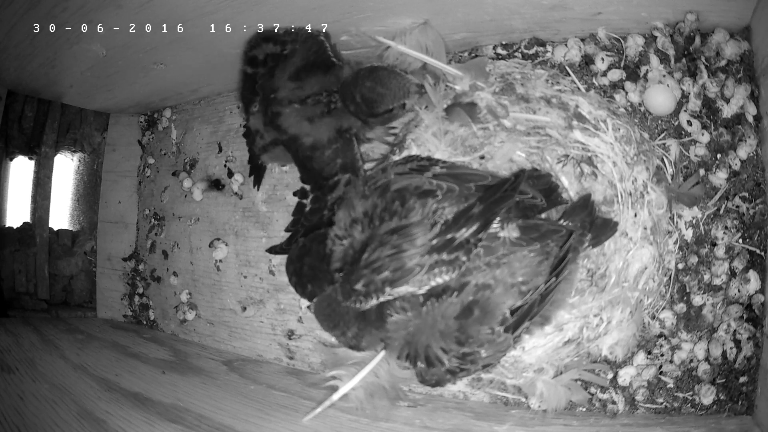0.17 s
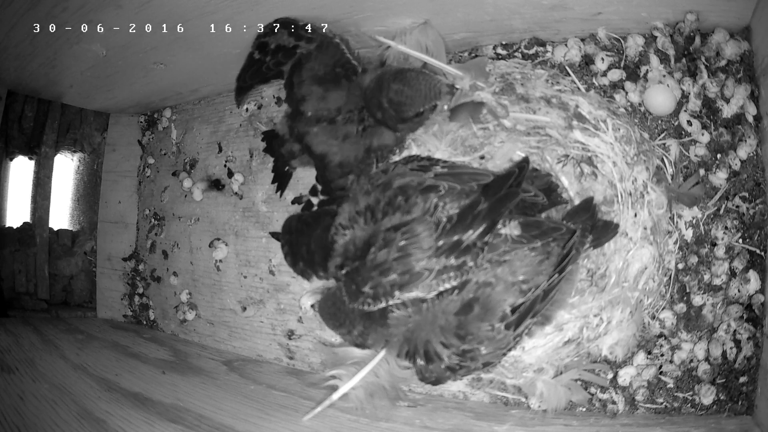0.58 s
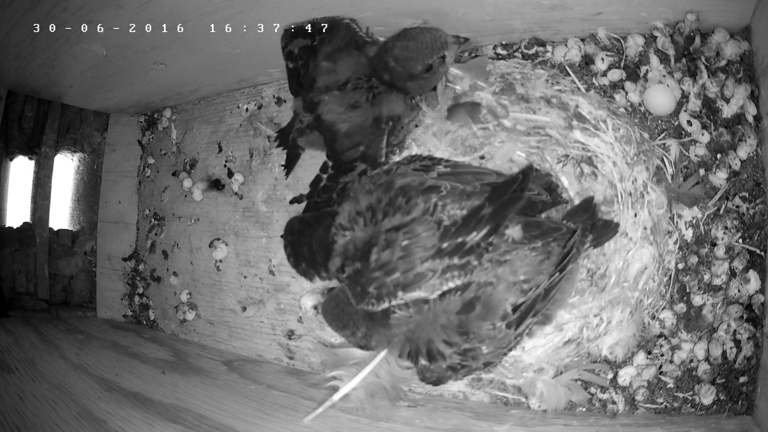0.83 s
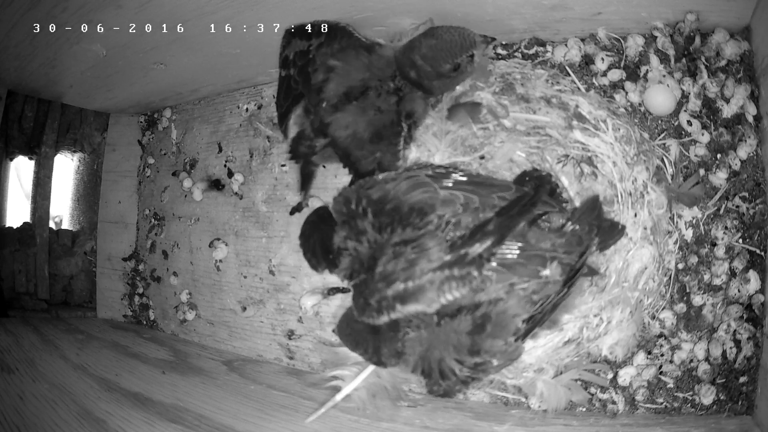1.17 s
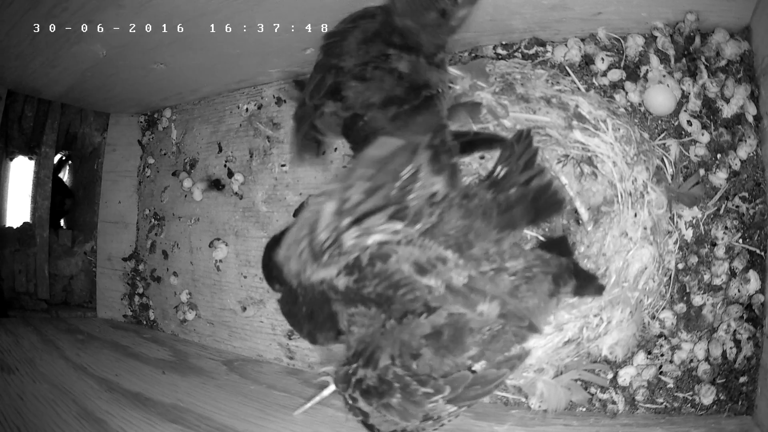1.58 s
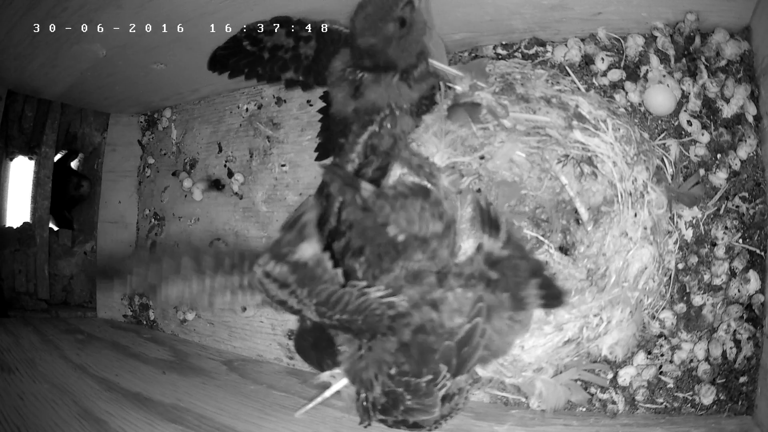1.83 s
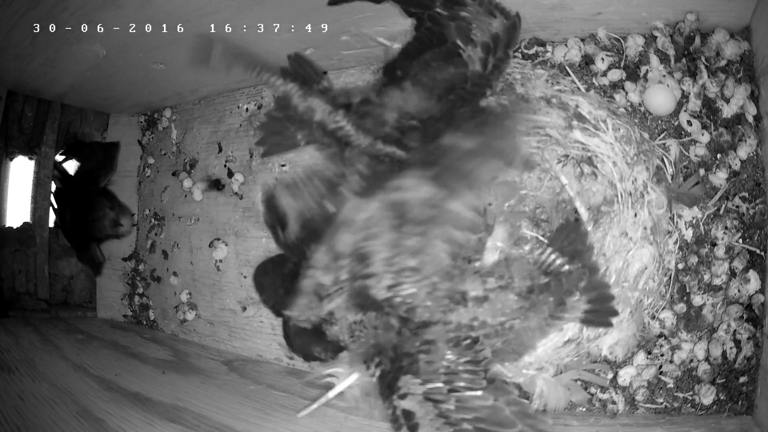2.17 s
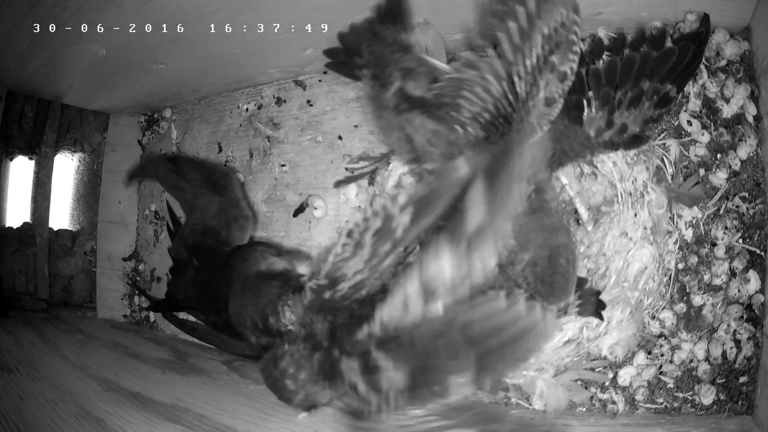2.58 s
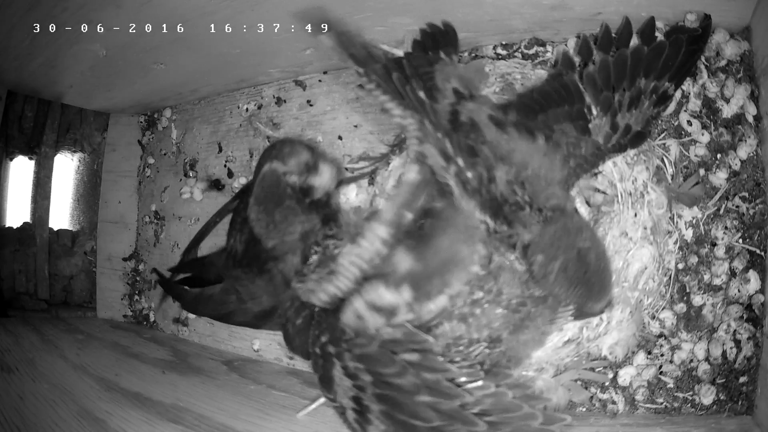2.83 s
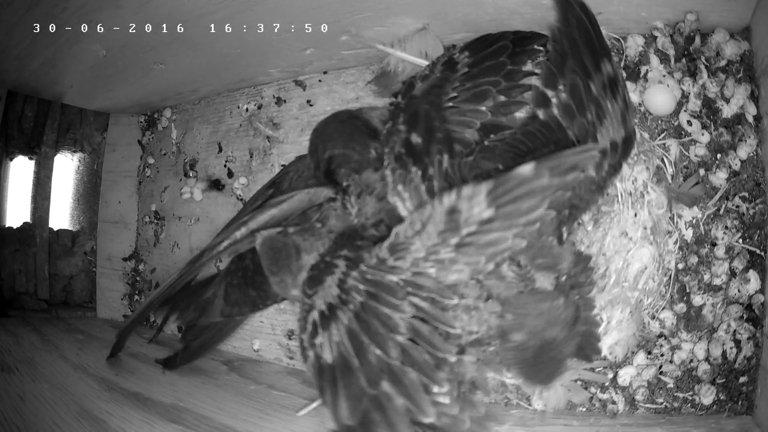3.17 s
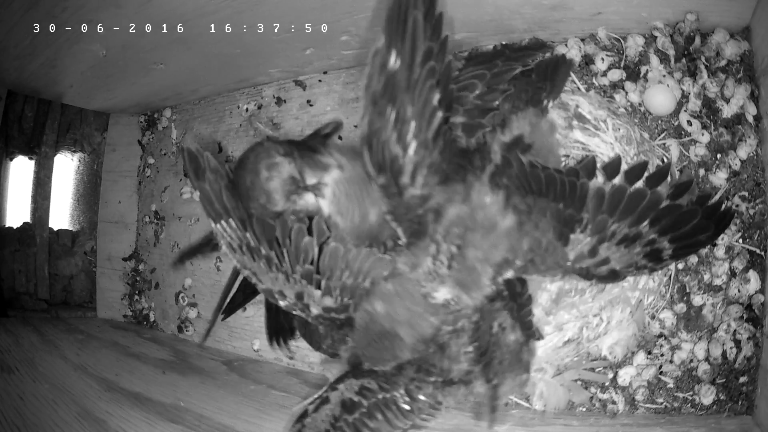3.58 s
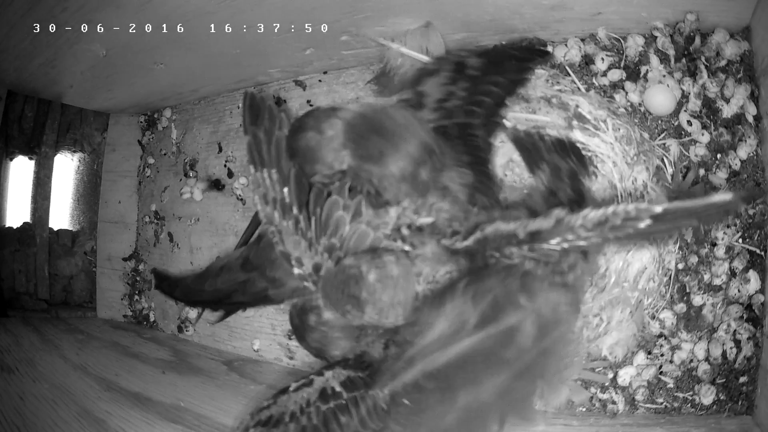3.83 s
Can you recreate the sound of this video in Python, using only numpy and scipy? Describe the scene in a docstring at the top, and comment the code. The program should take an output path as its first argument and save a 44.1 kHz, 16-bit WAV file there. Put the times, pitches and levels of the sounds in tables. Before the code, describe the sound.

Birds scramble in a small wooden nest box, close and boxy. Until 1.2 s there is only low shuffling, fine litter rustle and light feather ticks over faint hiss. A heavy thump lands near 1.3 s, then scrapes and wing puffs build. From 2.0 to 2.45 s hard, clattering feather strokes peak and distort, with a barely audible thin squeak near 2.2 s; uneven flapping and scratching continue, somewhat softer, to the end.

```python
"""A low shuffling and fine litter rustle come first, over a faint hiss; light feather strokes soon crackle on top.
Birds then scramble in a wooden nest box: stiff feathers scrape the walls as runs of clicks from catching barbs,
wings throw falling pressure waves and turbulent puffs, and landing bodies ring the low modes of the boards.
Claws and quills scrabble in noise bursts; two faint thin tones near 4 kHz move towards each other and part again.
All but the hiss, thumps and thin tones is coloured by the box; the loudest blows overload the close microphone."""
import sys
import numpy as np
from scipy import signal
from scipy.fft import rfft, irfft
from scipy.io import wavfile
from scipy.ndimage import map_coordinates

SR = 44100
rng = np.random.default_rng(int(sys.argv[2]) if len(sys.argv) > 2 else 0)


def materialize(psi):
    """Save the field psi as 16-bit PCM at rate SR to the path in sys.argv[1].

    A 1-D psi becomes a single channel; in a 2-D psi each row is a channel.
    """
    bounded = np.clip(np.atleast_2d(psi).T, -1, 1)
    quanta = np.round(bounded * 32767).astype(np.int16)
    wavfile.write(sys.argv[1], SR, quanta)


N = 176400  # samples


def amp(db):
    """Decibel definition: a level difference as an amplitude ratio."""
    return 10 ** (np.asarray(db) / 20)


def unit(x):
    """Normalisation to a root-mean-square amplitude of one."""
    return x / np.sqrt(np.mean(x ** 2) + 1e-20)


def along(points, hz):
    """Spectral envelope: (frequency [Hz], level [dB]) points joined on a logarithmic frequency axis."""
    f, v = np.transpose(points)
    return np.interp(np.log(hz + 1), np.log(f + 1), v)


def curve(rows):
    """Level contour: (time [s], level [dB]) rows interpolated to one value per sample."""
    return np.interp(np.arange(N) / SR, *np.transpose(rows))


def add(track, s, x):
    """Superposition: mix x into the track at time s."""
    i = max(round(s * SR), 0)
    track[i:i + len(x)] += x[:max(N - i, 0)]


def focus(f, hz, octaves):
    """Spectral concentration: a Gaussian bell around one pitch on an octave scale."""
    return np.exp(-.5 * (np.log2((f + 1) / hz) / octaves) ** 2)


def clicks(count, rate, spread_db):
    """Random impulse process: independently timed clicks of either sign and uneven size."""
    chance, sign = rng.random((2, count))
    size = amp(spread_db * np.clip(rng.standard_normal(count), -2, 2))
    return (chance < rate / SR) * np.sign(sign - .5) * size


def wobble(rate, count=N):
    """Slow random modulation: a spline through random knots, rate of them a second."""
    return map_coordinates(rng.standard_normal(2048), [np.arange(count) * rate / SR], mode="wrap")


def swell(t, length, rise, fall):
    """Amplitude envelope: linear attack, hold until length, exponential release."""
    return np.minimum(t / rise, 1) * np.exp(-np.maximum(t - length, 0) / fall)


def at_level(x, db, seconds):
    """Energy scaling: give a burst the energy of that level held for that long."""
    return x * amp(db) * np.sqrt(seconds * SR / (np.sum(x ** 2) + 1e-20))


# resonances of the box: (frequency [Hz], width [Hz], lift [dB])
BOX_MODES = [(80, 12, 5.5), (163, 59, 8.5), (304, 17, 12.5), (338, 28, 8.5), (462, 30, 3.5),
             (528, 60, 10.5), (672, 24, 12.5), (734, 32, 16), (915, 28, 9), (987, 30, 12), (1194, 30, 20.5),
             (1455, 40, 13), (1535, 36, 16), (1633, 60, 9), (1869, 35, 10), (2118, 46, 10.5), (2655, 40, 8),
             (3030, 110, 5.5), (3340, 90, 4), (3630, 64, 4.5), (4370, 70, 6), (4965, 110, 6), (5350, 52, 5),
             (5885, 44, 7), (6120, 30, 6), (6468, 70, 14), (6808, 22, 17)]
# dips in the spectrum: (frequency [Hz], width [Hz], cut [dB])
SPECTRAL_DIPS = [(246, 44, 9), (395, 40, 5.5), (612, 45, 9), (800, 30, 4), (1080, 45, 9.5), (1330, 70, 10),
                 (1990, 80, 10), (2830, 110, 5), (4020, 280, 4), (6650, 110, 7)]


def in_box(x, colour, ring=1, size=8192):
    """Minimum-phase filtering: a source colour (dB against Hz), the box resonances and the dips act causally."""
    f = np.fft.rfftfreq(size, 1 / SR)

    def bell(hz, width):
        return 1 / (1 + (2 * (f - hz) / width) ** 2)

    lift = 1 + sum((amp(db) ** 2 - 1) * bell(hz, width) for hz, width, db in BOX_MODES)
    cut = amp(-sum(db * bell(hz, width) for hz, width, db in SPECTRAL_DIPS))
    box = np.sqrt(np.abs(lift)) * cut
    # folding the cepstrum forward in time makes the response causal
    cepstrum = irfft(np.log(np.maximum(amp(colour(f)) * box ** ring, 1e-6)))
    cepstrum[1:size // 2] *= 2
    cepstrum[size // 2 + 1:] = 0
    response = irfft(np.exp(rfft(cepstrum)))
    return signal.fftconvolve(x, response)[:len(x)]


ECHO_T60_S, ECHO_DB = 0.016, -3  # 60 dB decay time, energy of the tail against the direct sound


def echo(x, size=2048):
    """Diffuse reverberation: dense decaying reflections between the walls, different from every spot."""
    tail = rng.standard_normal(size) * amp(-60 * np.arange(size) / SR / ECHO_T60_S)
    return x + amp(ECHO_DB) * signal.fftconvolve(x, tail / np.linalg.norm(tail))[:len(x)]


HISS_DB = -55.5
# spectrum of the hiss: (frequency [Hz], relative level [dB])
HISS_SPECTRUM = [(100, 9.5), (1500, 4), (4000, -7.5), (6500, -21.5), (7200, -31.5)]


def hiss():
    """Stationary noise: a faint, steady hiss shaped by its own spectrum, without the box."""
    noise = rng.standard_normal(N)
    return amp(HISS_DB) * unit(in_box(noise, lambda f: along(HISS_SPECTRUM, f), ring=0))


# two faint thin tones, one row: (time [s], length [s], level [dB], upper pitch away from the bend [Hz])
TONE_PAIR = (2.188, .052, -49, 4410)
BEND_HZ, BEND_S = 400, .006  # depth and Gaussian width of each tone's bend
ROUGHNESS, MIDWAY_HZ = .3, 4000  # depth of the amplitude roughness, pitch midway between the tones


def thin_tones():
    """Frequency modulation: two thin, rough tones near 4 kHz move towards each other and part again."""
    out = np.zeros(N)
    s, length, db, hz = TONE_PAIR
    n = int(length * SR)
    from_middle = np.arange(n) / SR - length / 2
    upper = hz - BEND_HZ * np.exp(-(from_middle / BEND_S) ** 2)
    lower = 2 * MIDWAY_HZ - upper
    tones = sum(np.sin(2 * np.pi * np.cumsum(pitch) / SR) for pitch in (upper, lower))
    rough = 1 + ROUGHNESS * wobble(600, count=n)
    add(out, s, amp(db) * unit(signal.windows.tukey(n) * rough * tones))
    return out


# course of the litter rustle, before the trims below: (time [s], level [dB])
RUSTLE_LEVEL = [(0.0, -43.5), (0.13, -51.5), (0.3, -54.5), (0.76, -52), (1.01, -49.5), (1.59, -40),
                (1.7, -41.5), (1.83, -37.5), (2.13, -29), (2.24, -34.5), (2.28, -30.5), (2.39, -29),
                (2.8, -33.5), (3.01, -35.5), (3.17, -36), (3.45, -33.5), (3.85, -39), (4.0, -39.5)]
# spectrum of the litter: (frequency [Hz], relative level [dB])
LITTER_SPECTRUM = [(100, -22), (300, -5), (600, -9.5), (1000, -4.5), (1500, -9.5), (2200, -10.5),
                   (3300, -17.5), (4000, -25), (4700, -22), (6400, -25.5), (7200, -28.5)]
# course of the low shuffling, before its trim: (time [s], level [dB])
SHUFFLE_LEVEL = [(0.0, -40.5), (0.23, -39), (1.05, -40), (1.25, -31.5), (1.59, -36), (1.72, -29.5),
                 (1.78, -23.5), (2.14, -31.5), (2.31, -26.5), (2.54, -30), (2.82, -31), (3.48, -29),
                 (4.0, -30)]
# spectrum of the shuffling: (frequency [Hz], relative level [dB])
SHUFFLE_SPECTRUM = [(25, -15.5), (60, -7), (120, -5), (170, -4.5), (230, -13.5), (400, -22.5), (800, -29.5),
                    (2000, -45.5), (7000, -67.5)]
RUSTLE_DB, SHUFFLE_DB = -4, -2.5  # trims added to the courses
CRACKLES_PER_S, CRACKLE_SPREAD_DB = 1200, 2.5
FLICKER_DB, FLICKER_KNOTS_PER_S = 3.5, 59.86  # largest swing of the crackle either way, and its pace
RUSTLE_RING = .7  # share of the box colouring, in dB, that the litter gets


def nest():
    """Granular friction: feet and plumage stir the litter, a fine crackle over low shuffling noise."""
    crackle = clicks(N, CRACKLES_PER_S, CRACKLE_SPREAD_DB)
    crackle = crackle * amp(FLICKER_DB * np.tanh(wobble(FLICKER_KNOTS_PER_S)))
    rustle = unit(in_box(crackle, lambda f: along(LITTER_SPECTRUM, f), ring=RUSTLE_RING))
    shuffle = unit(in_box(rng.standard_normal(N), lambda f: along(SHUFFLE_SPECTRUM, f)))
    rustle = rustle * amp(curve(RUSTLE_LEVEL) + RUSTLE_DB)
    return rustle + shuffle * amp(curve(SHUFFLE_LEVEL) + SHUFFLE_DB)


SCRATCHES_PER_S, SCRATCH_S, SCRATCH_FALL_S = 85, .005, .002  # rate, mean length, release
SCRATCH_SPREAD_DB = 5  # largest deviation either way
SCRATCH_DB, SCRATCH_TILT_DB = -3, 1  # trim on the rustle course; tilt per octave against the litter
RISE_SHARE = 0.21  # attack as a share of a scrape's length
TREBLE_HZ = 3000  # pivot of the scratch tilt and midpoint of the feather treble shelf


def scratches(size=1024):
    """Stick and slip: claws and quills make many tiny scrapes, each from another spot and so coloured anew."""
    out, t = np.zeros(N), np.arange(size) / SR
    draws = rng.random((int(SCRATCHES_PER_S * N / SR), 3))
    for k, (when, span, strength) in enumerate(draws):
        length = SCRATCH_S * (.5 + span)
        envelope = swell(t, length, RISE_SHARE * length, SCRATCH_FALL_S)
        scrape = unit(echo(rng.standard_normal(size) * envelope))
        db = SCRATCH_SPREAD_DB * (2 * strength - 1)
        add(out, (k + 2 * when) / SCRATCHES_PER_S, amp(db) * scrape)

    def colour(f):
        return along(LITTER_SPECTRUM, f) + SCRATCH_TILT_DB * np.log2((f + 1) / TREBLE_HZ)

    return unit(in_box(out, colour)) * amp(curve(RUSTLE_LEVEL) + SCRATCH_DB)


# bodies landing on the boards: (time [s], gain of the blow [dB])
LANDINGS = [(1.05, -20), (1.2803, 8.5), (1.839, -7.5), (3.393, -14.5), (3.537, -16)]
# lowest modes of the boards: (frequency [Hz], relative level [dB], 60 dB decay time [s])
BOARD_MODES = [(76, -13, .06), (143, 0, .075), (305, -26, .05)]
THUMP_RISE_S = .004  # time constant of the soft contact
PUSH_DB, PUSH_S = -13, .005  # gain of the dull shove, and the moment it reverses


def thumps(size=8192):
    """Modal excitation: a soft, heavy contact shoves the boards and rings their lowest modes."""
    out, t = np.zeros(N), np.arange(size) / SR
    ring = sum(amp(db - 60 * t / t60) * np.sin(2 * np.pi * hz * t) for hz, db, t60 in BOARD_MODES)
    push = amp(PUSH_DB) * (1 - t / PUSH_S) * np.exp(1 - t / PUSH_S)
    contact = 1 - np.exp(-t / THUMP_RISE_S)
    for s, db in LANDINGS:
        add(out, s, amp(db) * (ring + push) * contact)
    return out


# wing beats pushing air: (time [s], length [s], level [dB], strongest pitch [Hz])
WING_BEATS = [(.065, 0.051, -45, 279), (.24, 0.086, -41, 267.3), (1.17, 0.014, -40.5, 59),
              (1.273, 0.027, -18.5, 79), (1.33, 0.063, -34.5, 148), (1.369, 0.024, -37.5, 101),
              (1.52, 0.029, -28.5, 81), (1.607, 0.016, -24, 168), (1.64, 0.052, -30.5, 200.3),
              (1.745, 0.018, -24.5, 288), (1.81, 0.066, -24, 120.8), (1.915, 0.018, -25.5, 299.6),
              (2.03, 0.035, -32, 151.4), (2.105, 0.032, -27, 124), (2.145, 0.033, -20.5, 148.3),
              (2.21, 0.027, -31.5, 165), (2.25, 0.051, -24, 128.7), (2.3, 0.1, -29.5, 101.2),
              (2.365, 0.028, -26.5, 168), (2.415, 0.067, -23.5, 217), (2.52, 0.028, -28, 171),
              (2.57, 0.055, -30, 170.3), (2.625, 0.047, -25, 91), (2.71, 0.046, -29, 168),
              (2.76, 0.032, -30.5, 164), (2.915, 0.013, -34.5, 293), (3.003, 0.0042, -19, 166),
              (3.017, 0.012, -22.5, 229), (3.044, 0.053, -26.5, 115), (3.11, 0.04, -30, 230),
              (3.2, 0.032, -26, 379), (3.345, 0.0073, -26.5, 150), (3.392, 0.018, -21.5, 272),
              (3.43, 0.046, -28.5, 127), (3.54, 0.022, -18.5, 236.4), (3.575, 0.023, -22, 102),
              (3.705, 0.012, -25.5, 125), (3.872, 0.011, -27.5, 167), (3.938, 0.011, -30, 147)]
# spectrum of the moved air: (frequency [Hz], relative level [dB])
AIR_SPECTRUM = [(25, -8.5), (70, -2.5), (150, -8), (350, -9.5), (560, -22.5), (1200, -43.5), (3000, -51),
                (7000, -67)]
BUFFET_RISE_S, BUFFET_FALL_S, BUFFET_FOCUS_DB = 0.00821, 0.0096, 7
BUFFET_WAVE_SHARE = .45  # energy share of the smooth wave; the rest is turbulence
BUFFET_SWOOP_OCTAVES, BUFFET_WAVER_OCTAVES = 1, .3  # fall in pitch, scale of its unsteadiness


def wings(size=8192):
    """Displacement and turbulence: each beat throws a rounded wave, falling in pitch, and a noisy puff."""
    out, t = np.zeros(N), np.arange(size) / SR
    for s, length, db, hz in WING_BEATS:
        def air(f):
            return along(AIR_SPECTRUM, f)

        def focused_air(f):
            return air(f) + BUFFET_FOCUS_DB * focus(f, hz, octaves=1.0)

        envelope = swell(t, length, BUFFET_RISE_S, BUFFET_FALL_S)
        life = length + BUFFET_FALL_S
        swoop = BUFFET_SWOOP_OCTAVES * (.5 - np.minimum(t / life, 1))
        octaves = swoop + BUFFET_WAVER_OCTAVES * wobble(2 * hz, count=size)
        wave = unit(envelope * np.sin(2 * np.pi * np.cumsum(hz * 2 ** octaves) / SR))
        wave = unit(in_box(wave, air))
        eddies = unit(in_box(envelope * rng.standard_normal(size), focused_air))
        puff = np.sqrt(BUFFET_WAVE_SHARE) * wave + np.sqrt(1 - BUFFET_WAVE_SHARE) * eddies
        add(out, s - BUFFET_RISE_S / 2, at_level(puff, db, life))
    return out


# feather strokes on the walls: (time [s], length [s], level [dB], strongest pitch [Hz], treble lift [dB])
FEATHER_STROKES = [(0.056, 0.015, -30.5, 1410, -2.5), (0.077, 0.0077, -34, 1390, 3),
                   (0.093, 0.0078, -35.5, 1380, 3.5), (0.183, 0.0084, -43.5, 1570, -3),
                   (0.212, 0.014, -39.5, 1280, -1), (0.233, 0.019, -40, 1490, 9),
                   (0.258, 0.057, -36, 1240, -1), (0.442, 0.003, -46, 1530, 13),
                   (.515, 0.019, -45.5, 1420, 7), (0.582, 0.014, -40, 1180, 0),
                   (0.604, 0.014, -45.5, 1210, 9), (0.669, 0.0086, -40.5, 1520, 6),
                   (0.683, 0.033, -37.5, 1380, 8), (0.728, 0.056, -45, 1600, 8),
                   (0.789, 0.017, -40.5, 1600, 7), (1.121, 0.00096, -33, 3870, 10),
                   (1.272, 0.02, -24.5, 1530, 4), (1.35, 0.043, -41.5, 1000, -23),
                   (1.465, 0.026, -42.5, 1080, 9), (1.511, 0.025, -36, 855, -5),
                   (1.566, 0.02, -21.5, 1120, -5), (1.602, .012, -31, 950, -22),
                   (1.622, 0.016, -32.5, 980, 5.5), (1.663, 0.0038, -26.5, 670, -13),
                   (1.675, 0.016, -32, 715, -21), (1.748, 0.022, -31.5, 540, -19),
                   (1.765, 0.018, -35, 1450, -5.5), (1.805, 0.064, -31, 920, -13),
                   (1.849, 0.0046, -19.5, 1820, -2.5), (1.857, 0.022, -27, 1160, 6),
                   (1.916, 0.017, -38, 1040, 5.5), (1.96, 0.0048, -30.5, 1200, -16),
                   (2.022, 0.01, -13.5, 1296, 0), (2.072, 0.0095, -20, 1400, 4),
                   (2.117, 0.01, -20, 1860, 3), (2.142, 0.0092, -22.5, 1400, 3),
                   (2.15, 0.0072, -10, 1595, -0.5), (2.174, 0.006, -19.5, 1180, -10),
                   (2.243, 0.0094, -13, 2940, 3), (2.253, 0.0066, -16, 1200, 5.5),
                   (2.283, 0.0073, -21, 1270, 12.5), (2.289, 0.012, -15, 1222, -6.5),
                   (2.342, 0.0082, -12, 1560, 4), (2.352, 0.0087, -11.5, 1950, 5.5),
                   (2.391, 0.0036, -11, 1510, 7), (2.434, 0.025, -16.5, 740, -1.5),
                   (2.463, 0.011, -26, 1300, 4), (2.475, 0.0051, -41, 1410, 2),
                   (2.505, 0.017, -32.5, 1500, -1.5), (2.566, 0.016, -18.5, 1400, -7),
                   (2.578, 0.0089, -29.5, 1520, -3), (2.594, 0.014, -29, 1530, 17),
                   (2.634, 0.015, -27, 1610, -21), (2.664, 0.016, -25.5, 1370, 3),
                   (2.695, 0.0045, -23, 1570, 8), (2.704, 0.0046, -15.5, 1610, 4),
                   (2.711, 0.011, -20, 1440, 10), (2.759, 0.012, -26, 1550, 11.5),
                   (2.769, 0.02, -27.5, 1500, 4), (2.795, 0.024, -26.5, 1850, 5),
                   (2.861, 0.0027, -21.5, 1600, 6.5), (2.869, 0.0092, -18.5, 1350, 7),
                   (2.908, 0.01, -24, 1490, -2.5), (2.967, 0.0038, -25.5, 1840, 0),
                   (3.043, 0.0067, -25, 1300, 11), (3.048, 0.0069, -16.5, 1760, 6.5),
                   (3.111, .012, -37, 530, -14.5), (3.138, 0.018, -30, 1320, -2),
                   (3.21, 0.014, -25.5, 615, -4), (3.25, 0.013, -25, 1500, -1.5),
                   (3.266, 0.013, -23, 1200, 0), (3.372, 0.03, -33.5, 1450, -7),
                   (3.454, 0.01, -29, 1340, 1), (3.489, 0.0071, -22, 1550, 4),
                   (3.518, 0.0025, -30.5, 1540, 6), (3.538, 0.0037, -24, 1470, -7),
                   (3.569, 0.07, -34, 1510, 1), (3.625, 0.0097, -23.5, 1635, 4.5),
                   (3.679, 0.015, -39, 1500, -12), (3.746, 0.014, -28.5, 784, -14),
                   (3.775, 0.0089, -34.5, 1510, 14), (3.835, 0.004, -27, 1510, 7),
                   (3.874, 0.009, -19.5, 1580, 11), (3.893, 0.0028, -18.5, 1290, 9.5),
                   (3.932, 0.0039, -26.5, 1460, 7), (3.969, 0.036, -37.5, 1420, -3)]
# spectrum of feather on wood: (frequency [Hz], relative level [dB])
FEATHER_SPECTRUM = [(100, -12.5), (400, -2.5), (800, -3.5), (1500, -2), (2300, -3.5), (3300, -8.5),
                    (4000, -18), (4800, -14.5), (6400, -18.5), (7100, -28)]
STROKE_FALL_S, BARB_SPREAD_DB = 0.0024, 2.5
# light strokes catch fewer barbs and break up into ticks
BARBS_PER_S, FIRM_DB = 1600, -22  # catching rate of a stroke at the firm level
BARBS_DOUBLE_DB = 9  # rise in level that doubles the rate
STROKE_GRAIN_SHARE = .8  # energy share of catching barbs; the rest is smooth sliding
FOCUS_DB, FOCUS_OCTAVES = 8.5, 0.18


def feathers(size=8192):
    """Stick-slip friction: each stroke slides over the wood while a quick run of barbs catches on it."""
    out, t = np.zeros(N), np.arange(size) / SR
    for s, length, db, hz, treble_db in FEATHER_STROKES:
        def colour(f):
            treble = treble_db * f ** 2 / (f ** 2 + TREBLE_HZ ** 2)
            return along(FEATHER_SPECTRUM, f) + FOCUS_DB * focus(f, hz, FOCUS_OCTAVES) + treble

        barbs_per_s = BARBS_PER_S * 2 ** ((db - FIRM_DB) / BARBS_DOUBLE_DB)
        barbs = unit(clicks(size, barbs_per_s, BARB_SPREAD_DB))
        sliding = rng.standard_normal(size)
        scrape = np.sqrt(STROKE_GRAIN_SHARE) * barbs + np.sqrt(1 - STROKE_GRAIN_SHARE) * sliding
        stroke = echo(scrape * swell(t, length, RISE_SHARE * length, STROKE_FALL_S))
        add(out, s, at_level(in_box(stroke, colour), db, length + STROKE_FALL_S))
    return out


def scene():
    """Superposition: all the layers add up over the hiss, in one channel."""
    background = hiss()
    layers = feathers() + scratches() + wings() + thumps() + thin_tones() + nest()
    return (layers + background)[None]


CLIP_LEVEL, CLIP_KNEE = .5, 16  # ceiling of the peaks, sharpness of the bend
TOP_HZ = 7350  # upper band limit


def record(dry):
    """Saturation and band-limiting: the microphone flattens the loudest peaks and drops the top treble."""
    # the 15.5 lowers quiet sounds by about 1.5 dB
    clipped = dry / (15.5 + np.abs(dry / CLIP_LEVEL) ** CLIP_KNEE) ** (1 / CLIP_KNEE)
    lowpass = signal.firwin(301, TOP_HZ, fs=SR, window=("kaiser", 8))
    return signal.fftconvolve(clipped, lowpass[None], mode="same", axes=1)


dry = scene()
out = record(dry)
materialize(out)
```